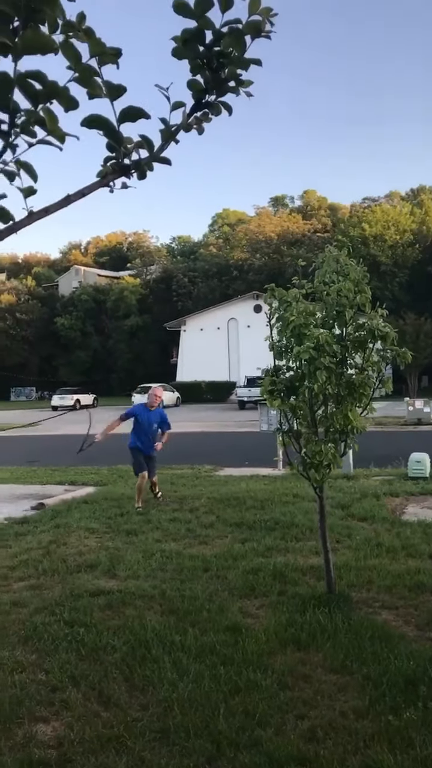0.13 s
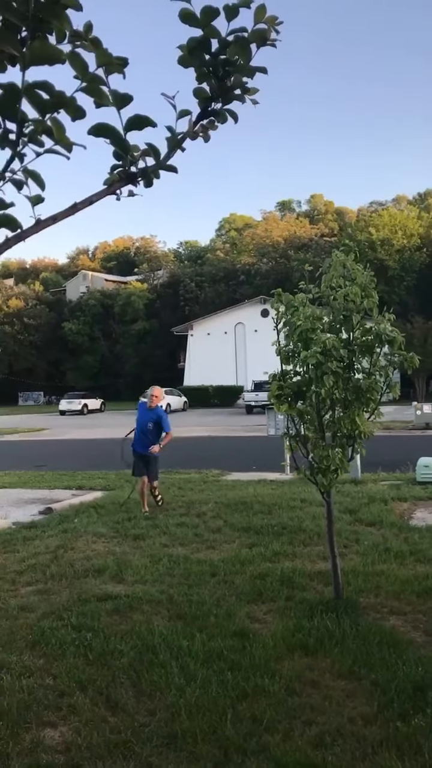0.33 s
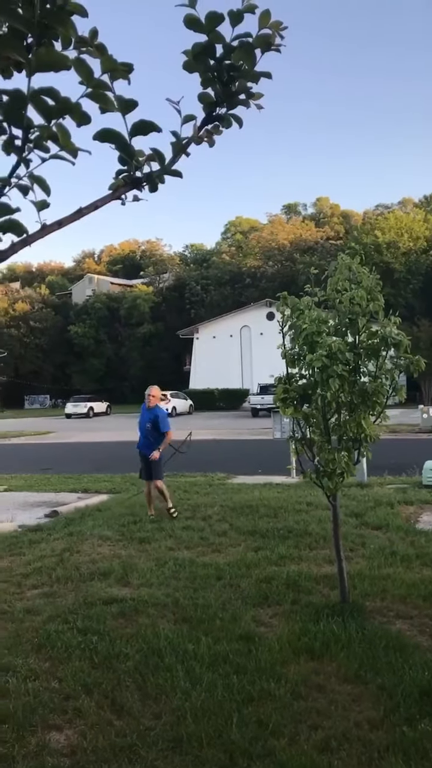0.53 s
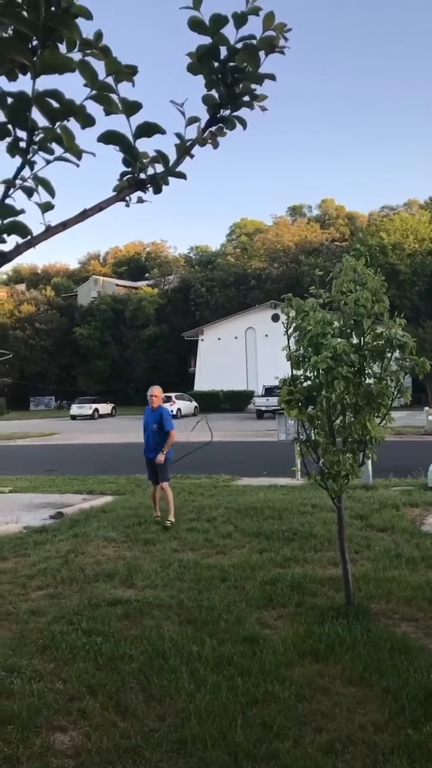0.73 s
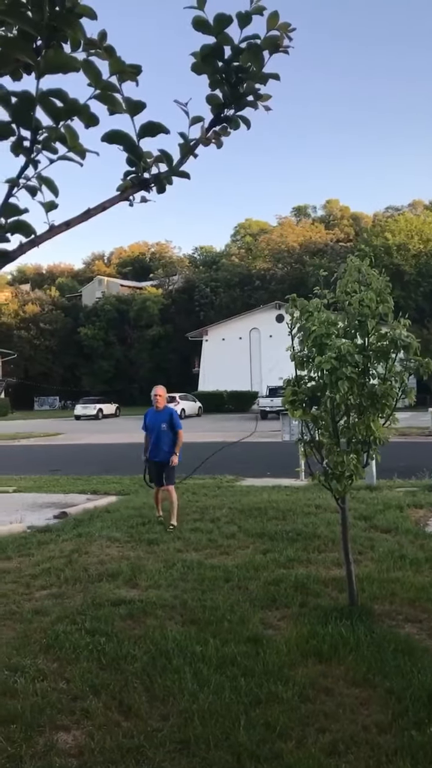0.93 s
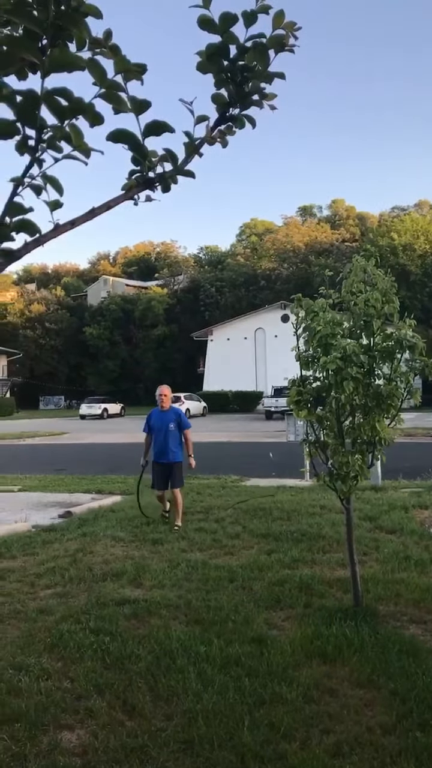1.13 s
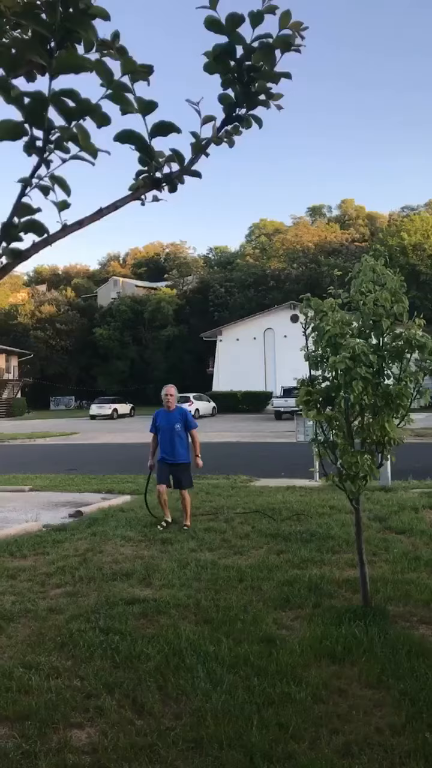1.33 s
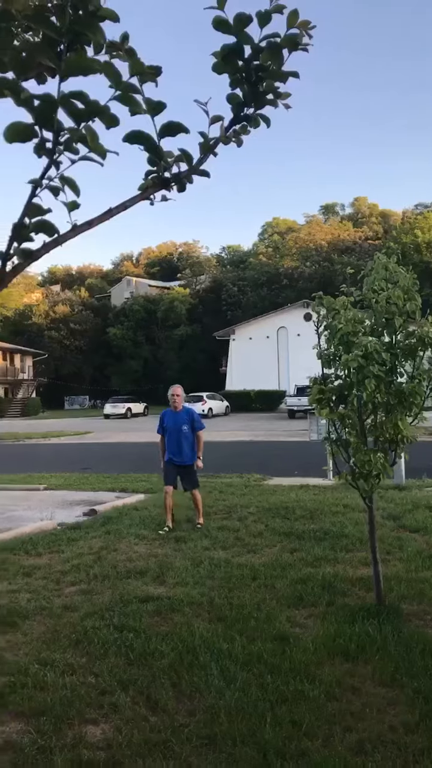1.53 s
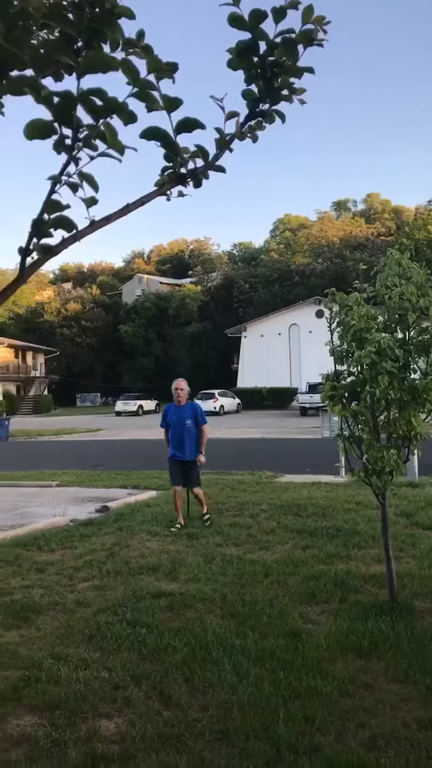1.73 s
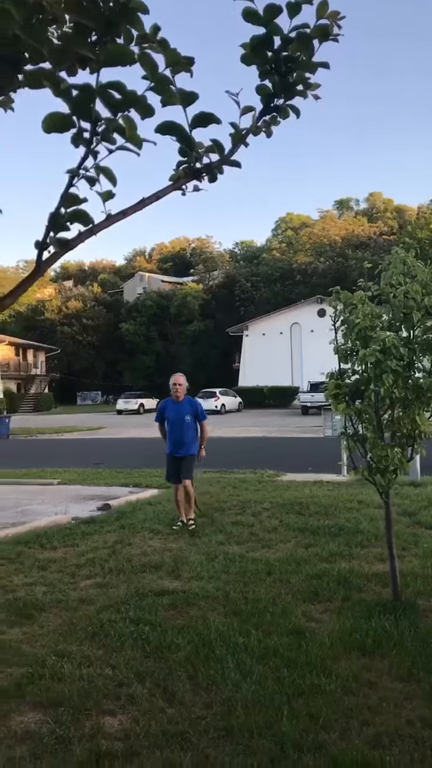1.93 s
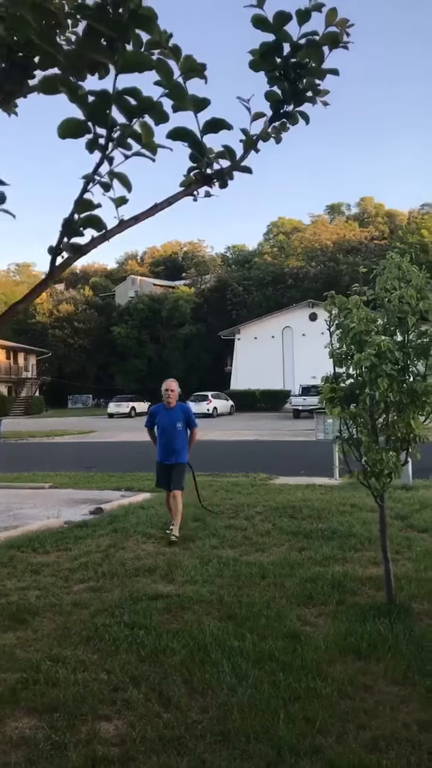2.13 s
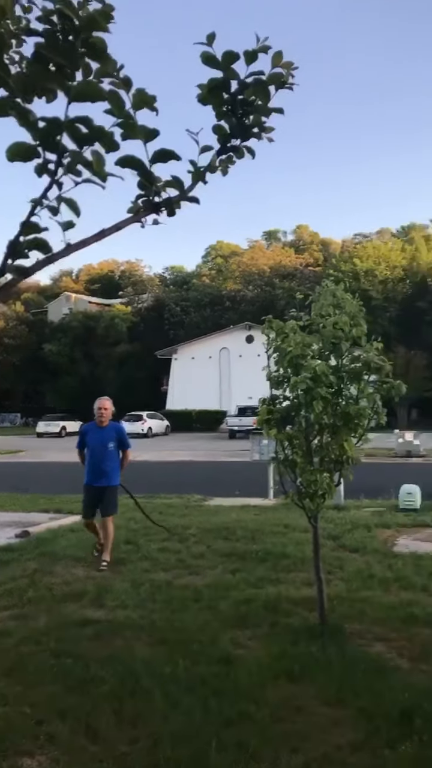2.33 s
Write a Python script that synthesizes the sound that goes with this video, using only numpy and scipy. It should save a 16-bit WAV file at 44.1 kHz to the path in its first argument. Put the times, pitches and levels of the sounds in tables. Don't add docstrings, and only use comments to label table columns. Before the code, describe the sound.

One loud whip crack in an open suburban yard, with clattering echoes dying into faint traffic

```python
import sys
import numpy as np
from scipy import signal
from scipy.fft import rfft, irfft
from scipy.io import wavfile
from scipy.ndimage import uniform_filter1d

SR = 44100
rng = np.random.default_rng(int(sys.argv[2]) if len(sys.argv) > 2 else 0)


def boost(x):
    u = np.asarray(x, float) / 20
    return 10 ** u


def inscribe(sig):
    pcm = np.round(np.clip(np.atleast_2d(sig).T, -1, 1) * 32767)
    wavfile.write(sys.argv[1], SR, pcm.astype(np.int16))


N = 110205
TIME = np.arange(N) / SR
FREQ = np.fft.rfftfreq(N, 1 / SR) + 1e-3

# pitch_hz, level_db (per Hz)
TRAFFIC_COLOUR = [(22, -7), (55, 1), (110, -7.5), (230, -9), (600, -21.5), (1000, -21), (2500, -36),
                  (4300, -50)]
# time_s, level_db
TRAFFIC_LEVEL = [(0, -1.5), (.2, 0.5), (1.0, 0), (1.2, 0.5), (1.4, -1), (1.6, 1), (1.8, -1), (2.0, -0.5),
                 (2.25, 1), (2.5, 0)]
# pitch_hz, width_hz, level_db
MACHINE_HUM = [
    (59, 9.4, -51),
    (223, 29, -56.5),
    (350.8, 2.54, -57),
]
# pitch_hz, level_db (per Hz)
LEAF_COLOUR = [(1500, -16), (3000, 6), (4400, -0.5), (5600, 3.5), (7200, -4.5), (9000, -4), (12000, -18.5),
               (16000, -17)]
# time_s, level_db
BREEZE_LEVEL = [(0, 0), (.2, 7), (.9, 4), (1.3, 4), (1.55, -9), (1.75, -2), (2.0, 0), (2.2, 3), (2.5, 2)]
# start_s, peak_db, pitch_hz, length_s
BIRD_CHIPS = [
    (.06, -66, 5550, .05),
    (1.094, -57, 5460, .035),
    (2.187, -60, 3450, .02),
    (2.223, -53, 3460, 0.018),
    (2.243, -47, 3420, 0.006),
    (2.249, -52, 3430, 0.0067),
]
# start_s, peak_db, pitch_hz, decay_cycles
TWIG_TICKS = [(1.059, -29.5, 4030, 1.4), (1.061, -37, 6200, 2.8), (1.788, -46, 11000, 1.2),
              (1.947, -45, 2720, 6), (1.947, -39.5, 8000, 1.2), (2.026, -55, 3330, 7),
              (2.3712, -33, 1600, 4), (2.3725, -39, 2300, 4.1), (.2462, -25, 2300, 4),
              (2.373, -52, 5400, 3.5), (2.437, -38.5, 8000, 1.2)]
# start_s, attack_s, hold_s, release_s (per 20 dB), level_db
GRASS_RUSTLES = [
    (.04, 0.02, 0.062, 0.12, -67.5),
    (.88, 0.18, .07, 0.14, -55),
    (1.2, 0.035, 0.025, 0.13, -66.5),
    (1.39, 0.062, 0.043, 0.045, -65),
    (1.74, 0.032, .01, .15, -67),
    (2.1, 0.055, 0.089, .1, -81),
    (2.41, 0.022, 0.023, .05, -75),
]
# pitch_hz, level_db (per Hz)
RUSTLE_COLOUR = [(2500, -18.5), (4000, -8.5), (5600, 0), (7800, -8), (10000, -9), (12500, -1),
                 (16000, -7.5)]
# start_s, attack_s, hold_s, release_s (per 20 dB), level_db
FOOT_SCUFFS = [
    (2.3102, .001, .016, .022, -43.5),
    (2.338, .003, .004, .005, -49),
    (2.364, .008, .006, .012, -60),
]
# pitch_hz, level_db (per Hz)
SCUFF_COLOUR = [(1100, -40), (1700, -10), (2200, -3), (3400, -1.5), (4300, -10.5), (6000, -8), (10400, -14),
                (15500, -21)]
# start_s, attack_s, hold_s, release_s (per 20 dB), level_db
LASH_SWISH = [
    (.226, 0.0087, 0.0023, .014, -33.5),
    (.246, .003, .001, .002, -40),
]
# pitch_hz, level_db (per Hz)
SWISH_COLOUR = [(290, -28), (500, 0.5), (3650, -14), (6800, -11.5), (9630, -24.5), (14500, -20),
                (16000, -39)]
# delay_ms (after the crack), level_db
SHOCK_ARRIVALS = [
    (0, -6),
    (.43, -4),
    (.88, -12),
    (1.92, -6),
    (2.42, -6),
]
# start_s, peak_db
WALL_ECHOES = [
    (0.378, -18.5),
    (0.4653, -26.5),
    (0.5013, -27),
    (0.5686, -26),
    (0.6649, -22.5),
    (0.7634, -42),
    (0.821, -28),
    (0.9954, -30),
    (1.1834, -32),
]
# time_s, level_db
SCATTER_LEVEL = [(0.252, -16.5), (0.26, -16), (0.292, -17.5), (0.32, -27.5), (0.368, -34.5), (0.38, -33.5),
                 (0.396, -40), (0.444, -49.5), (0.464, -42), (0.578, -37.5), (0.722, -43.5), (0.956, -47.5),
                 (1.006, -41.5), (1.594, -67), (1.7, -75)]

CRACK_S = .24995


def unit(x):
    return x / np.sqrt(np.mean(x ** 2))


def read(table, x, log=False):
    a = np.array(table, float)
    if log:
        return np.interp(np.log(x), np.log(a[:, 0]), a[:, 1])
    return np.interp(x, a[:, 0], a[:, 1])


def walk(rate_hz):
    hold = int(SR / rate_hz)
    levels = np.repeat(rng.standard_normal(N // hold + 1), hold)
    return 1.48 * uniform_filter1d(uniform_filter1d(levels, hold), hold)[:N]


def bands(spectrum, per_octave):
    for k in np.arange(4.5 * per_octave, 14.3 * per_octave):
        mask = np.clip(1 - np.abs(np.log2(FREQ) * per_octave - k), 0, 1)
        yield 2 ** (k / per_octave), irfft(spectrum * mask, N)


def noise_spectrum():
    return rfft(rng.standard_normal(N))


def grains(uneven_db, per_s):
    chance, side, size = rng.random((3, N))
    clicks = (chance < per_s / SR) * np.sign(side - .5)
    return unit(clicks * boost(-uneven_db * np.log(size + 1e-9)))


def town():
    level_db, flicker_db = -42.5, 1.2
    road = 0
    for hz, band in bands(noise_spectrum() * boost(read(TRAFFIC_COLOUR, FREQ, True)), 1.932):
        steadier = min(1, (300 / hz) ** 0.27)
        road = road + band * boost(flicker_db * walk(14) * steadier)
    hum = 0
    for hz, width, db in MACHINE_HUM:
        resonance = 1 / (1 + ((FREQ - hz) / width) ** 2)
        hum = hum + boost(db) * unit(irfft(noise_spectrum() * resonance, N))
    return boost(read(TRAFFIC_LEVEL, TIME)) * (boost(level_db) * unit(road) + hum)


def leaves():
    hiss = irfft(noise_spectrum() * boost(read(LEAF_COLOUR, FREQ, True)), N)
    return boost(-70.5 + read(BREEZE_LEVEL, TIME) + .7 * walk(8)) * unit(hiss)


def gain_control():
    start_s, depth_db = .265, -19
    fall_s, hold_s, back_s = .05, 0.065, .9
    t = TIME - start_s
    fall = np.clip(t / fall_s, 0, 1)
    back = np.clip((t - fall_s - hold_s) / back_s, 0, 1)
    return boost(depth_db * (fall - back))


def bird():
    out = np.zeros(N)
    flutter_db = 3.5 * walk(400)
    for s, db, hz, length in BIRD_CHIPS:
        t = np.clip((TIME - s) / length, 0, 1)
        whistle = np.sin(2 * np.pi * hz * (TIME - s) * (1 - 0.017 * t))
        out = out + boost(db - 3 + flutter_db) * np.sin(np.pi * t) ** 2 * whistle
    return out


def twigs():
    out = np.zeros(N)
    for s, db, hz, cycles in TWIG_TICKS:
        t = np.clip(TIME - s, 0, .05)
        out = out + boost(db) * np.sin(2 * np.pi * hz * t) * np.exp(-t * hz / cycles) * (t < .05)
    return out


def brush(events, colour, uneven_db, per_s):
    envelope = 0
    for s, attack, hold, release, db in events:
        t = TIME - s
        release_db = -20 * np.clip(t - attack - hold, 0, None) / release
        envelope = envelope + np.clip(t / attack, 0, 1) ** 2 * boost(db + release_db)
    spectrum = rfft(grains(uneven_db, per_s)) * boost(read(colour, FREQ, True))
    return envelope * unit(irfft(spectrum, N))


def grass():
    return brush(GRASS_RUSTLES, RUSTLE_COLOUR, 1.2, 12000)


def feet():
    return brush(FOOT_SCUFFS, SCUFF_COLOUR, 2.0, 12000)


def lash():
    return brush(LASH_SWISH, SWISH_COLOUR, 2.9, 14000)


def thump():
    length_s = 0.022
    t = np.clip((TIME - CRACK_S) / length_s, 0, 1)
    push = boost(-34) * np.sin(2 * np.pi * 70 * length_s * t)
    knock = boost(-34.5) * np.sin(2 * np.pi * 148 * length_s * t)
    return np.sin(np.pi * t) * (push + knock)


def shock(ms):
    rise_hz, ring_hz, ring_q, bass_share = 31000, 1995, 1.51, 0.67
    w = np.pi * FREQ * ms / 1000
    s = 1j * FREQ / ring_hz
    n_wave = 1j * (np.sin(w) / w ** 2 - np.cos(w) / w) * np.exp(-1j * w) * ms * SR / 1000
    ring = (s ** 2 + bass_share * (1 + s)) / (1 + s / ring_q + s ** 2)
    return n_wave / (1 + 1j * FREQ / rise_hz) * ring


def path_db(hz, late_s):
    air = 8.5 * late_s * ((hz / 2000) ** 1.29 - 1)
    bass = 5.5 * max(np.log2(1300 / hz), 0) * np.clip(late_s / 0.38, 0, 1)
    return -air - bass


def direct_shock(wave):
    arrivals = 0
    for ms, db in SHOCK_ARRIVALS:
        arrivals = arrivals + boost(db) * np.exp(-2j * np.pi * FREQ * (CRACK_S + ms / 1000))
    return wave * arrivals


def wall_echoes(wave):
    smear_ms = 4.0
    bursts = 0
    for s, db in WALL_ECHOES:
        decay = np.exp(-np.clip(TIME - s, 0, .1) * 1000 / smear_ms)
        bursts = bursts + boost(db - 4 - 9.5) * (TIME > s) * decay
    return rfft(grains(1.2, 5000) * bursts) * wave


def scatter(shock_ms):
    spread = 0.075
    spectrum = 0
    for stretch, db in ((1 - spread, 0), (1 + spread, 0), (.72, -15)):
        spectrum = spectrum + boost(db) * rfft(grains(2, 9000)) * shock(shock_ms * stretch)
    level = boost(read(SCATTER_LEVEL, TIME) + 1.5 + 1.0 * walk(45.07))
    onset = np.clip((TIME - CRACK_S) / 0.0044, 0, 1)
    fade = boost(-40 * np.clip(TIME - 1.6, 0, None))
    return unit(irfft(spectrum, N)) * level * onset * fade


def crack():
    shock_ms = 0.335
    wave = shock(shock_ms)
    returns = direct_shock(wave) + wall_echoes(wave) + rfft(scatter(shock_ms))
    late_s = np.clip(TIME - CRACK_S, 0, None)
    return sum(band * boost(path_db(hz, late_s)) for hz, band in bands(returns, 3))


def scene():
    background = (town() + leaves()) * gain_control()
    nearby = bird() + twigs() + grass() + feet() + lash()
    return (background + nearby + thump() + crack())[None]


def band_limit(x):
    return signal.sosfilt(signal.butter(12, 15900, fs=SR, output="sos"), x)


def record(dry):
    ceiling = .9
    limited = np.tanh(dry / ceiling) * ceiling
    top_cut = signal.ellip(10, .2, 70, 15900, fs=SR, output="sos")
    mix = signal.sosfilt(top_cut, limited)
    return band_limit(mix)


dry = scene()
out = record(dry)
inscribe(out)
```